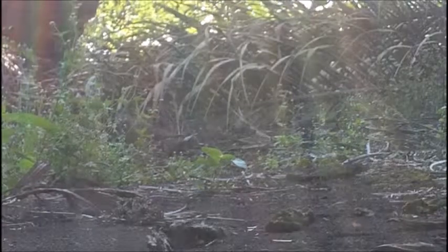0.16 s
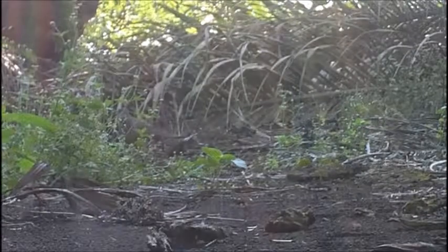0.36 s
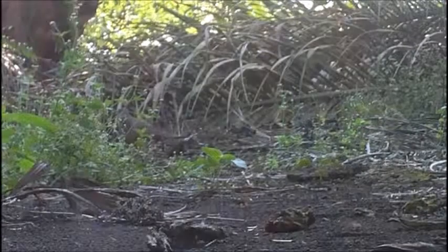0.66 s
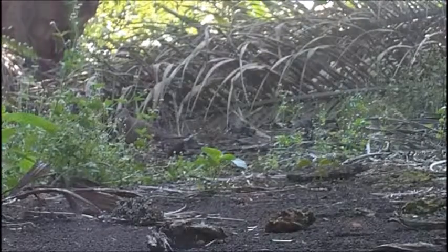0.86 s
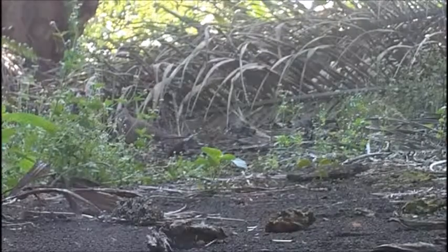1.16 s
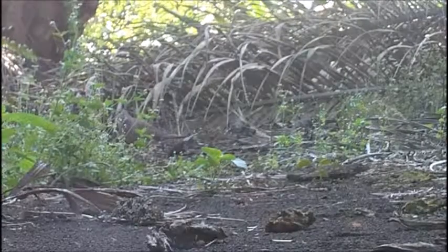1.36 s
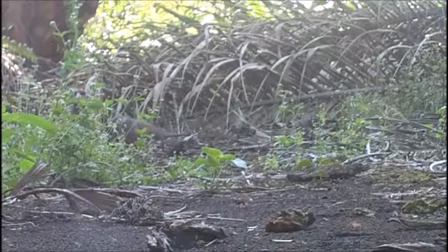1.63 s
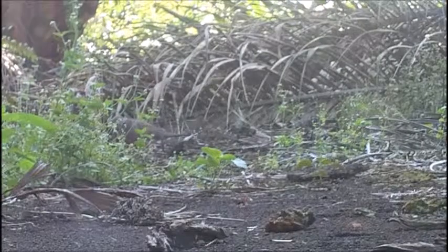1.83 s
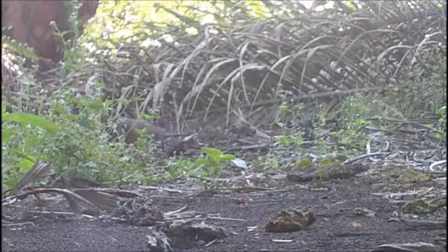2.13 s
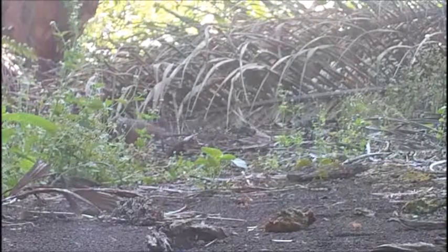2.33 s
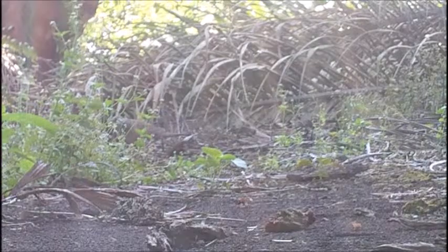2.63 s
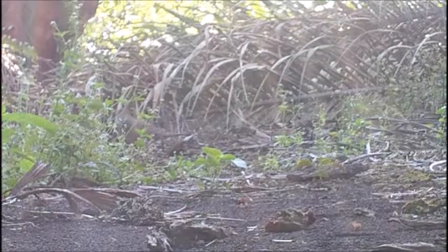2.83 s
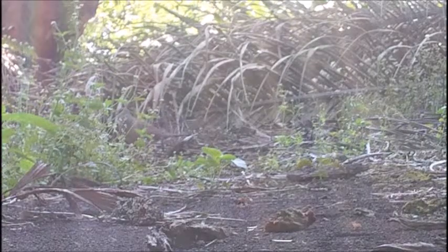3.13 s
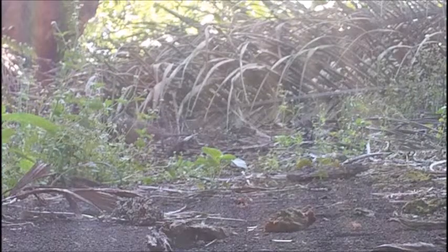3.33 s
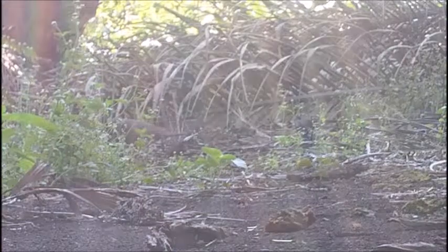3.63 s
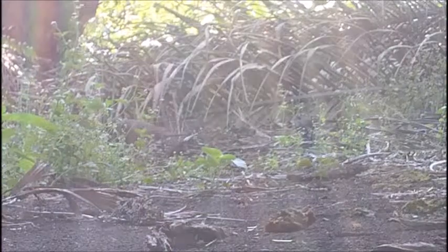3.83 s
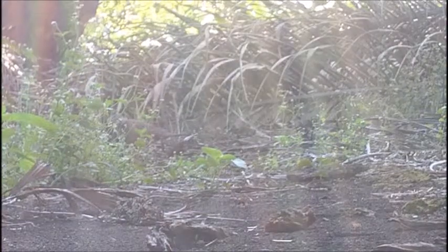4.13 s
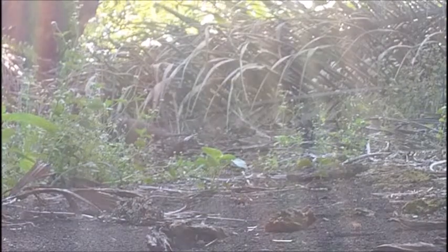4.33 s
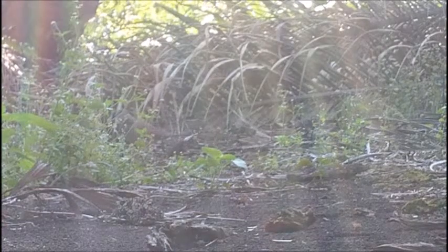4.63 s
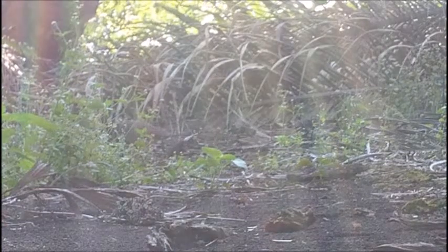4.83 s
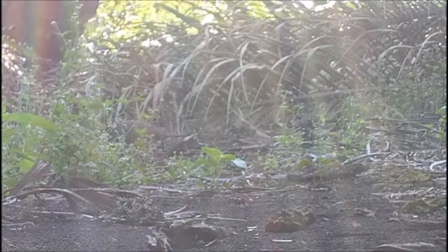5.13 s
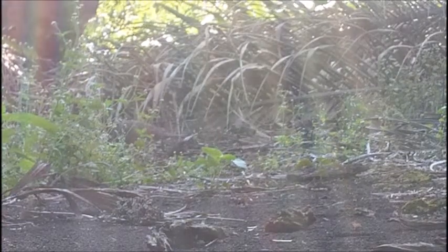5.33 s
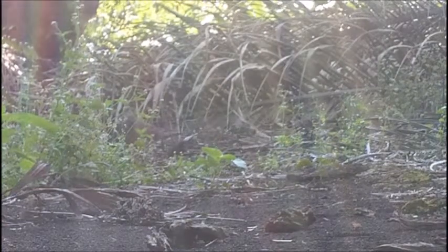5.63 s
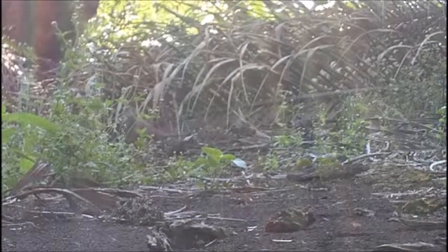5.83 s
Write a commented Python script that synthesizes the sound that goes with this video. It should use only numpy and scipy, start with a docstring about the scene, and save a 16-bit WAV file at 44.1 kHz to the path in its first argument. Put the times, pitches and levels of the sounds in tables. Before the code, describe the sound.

In a leafy thicket, a distant dove hoots and purrs. A small songbird breaks into quick whistled chatter as a nearer dove starts its phrases, each a two-humped coo followed by a rolled, sinking purr. The doves trade calls, and near the end another small bird gives a run of high rising pips. Soft outdoor hiss and a thin insect whine continue underneath, and the calls have short echoes.

```python
"""First come a thin insect whine and soft outdoor hiss. Then two doves, one far and one near, trade coos:
nearly pure tones that a fluttering valve in the throat chops into a purr. Something far away holds one
long call, a songbird chatters in quick gliding whistles, and near the end another bird pips in a rising
series. Faint ticks, a low rumble and stirring leaves lie underneath. The thicket gives every call
short echoes."""
import sys
import numpy as np
from scipy import signal
from scipy.fft import rfft, irfft
from scipy.io import wavfile
from scipy.ndimage import uniform_filter1d

SR = 44100
rng = np.random.default_rng(int(sys.argv[2]) if len(sys.argv) > 2 else 0)


def dump_mix(stems):
    """Bounce the given channels to the path in sys.argv[1] as a 16-bit WAV at rate SR."""
    frames = np.atleast_2d(stems).T  # one column per channel
    limited = np.clip(frames, -1, 1)  # hard clip at full scale
    pcm = np.round(limited * 32767).astype(np.int16)
    wavfile.write(sys.argv[1], SR, pcm)


N = 263718
T = np.arange(N) / SR

# tone colour of the outdoor hiss: (frequency [Hz], relative level [dB])
HISS_SPECTRUM = [(25, -39), (50, -33), (80, -27), (125, -18), (200, -14.5), (280, -10.5), (400, -7),
                 (700, -3.5), (1500, -5.5), (2500, -9), (4500, -13), (9000, -15), (16000, -15)]
# brief dips in the hiss: (middle [s], half length [s], depth [dB])
LEVEL_DIPS = [(.317, .016, 12), (4.546, .016, 12)]
# bands of noise that make up the insect whine: (centre [Hz], width [Hz], level [dB])
INSECT_BANDS = [(7156, 210, -66.5), (7044, 1270, -65), (10260, 1200, -74), (11630, 710, -74.5),
                (14500, 1200, -72.5)]
# soft stirrings in the undergrowth: (middle [s], half length [s], level [dB])
LEAF_STIRS = [(3.7, 0.75, -74.5), (5.854, 0.8, -67)]
# faint treble ticks: (time [s])
TICK_TIMES = [.448, .649, .748, 1.002, 1.7, 1.75, 2.701, 2.801, 3.004, 3.499, 3.75, 4.25, 5.001, 5.799]

# echoes off trunks and a bank: (delay [s], relative level [dB])
TRUNK_ECHOES = [(.026, -10), (.036, -37), (.071, -12)]
# echoes around the pipping bird's perch: (delay [s], relative level [dB])
PIP_ECHOES = [(0.015, -4), (0.034, -12)]
# echoes around the songbird: (delay [s], level [dB])
CHATTER_ECHOES = [(.013, -16), (.026, -9), (.039, -17), (.052, -17), (.071, -11.5)]

# the tune of the long far call: (time [s], base pitch [Hz])
CALL_TUNE = [(.44, 680), (0.554, 701.5), (.63, 685.5), (.78, 684), (0.871, 660), (.98, 632.5), (1.1, 631)]
# its overtones: (multiple of the base pitch, start level [dB], middle level [dB], end level [dB])
CALL_OVERTONES = [(4, -64.5, -71, -82), (5, -73, -71, -80), (6, -78, -71.5, -68.5)]
# the small bird's pips: (time [s], length [s], level [dB], starting pitch [Hz])
PIP_NOTES = [(5.106, .031, -58, 2700), (5.238, 0.023, -55.5, 2830), (5.366, 0.028, -49, 2750),
             (5.487, 0.03, -47.5, 2700), (5.615, 0.063, -50.5, 2630), (5.759, 0.062, -51.5, 2635),
             (5.92, 0.051, -50, 2560)]
# the songbird's pitch glides, by syllable name: (start [Hz], middle [Hz], end [Hz])
SYLLABLE_GLIDES = {"rise": (1154, 1610, 2420), "whistle": (2420, 2250, 2210), "low": (1630, 1490, 1360),
                   "slur": (2160, 1900, 1620), "high": (3000, 2800, 2430), "drop": (3050, 2700, 1980)}
# its chatter and a few stray notes: (time [s], length [s], level [dB], rasp [0-1], syllable name)
CHATTER_NOTES = [(.002, 0.028, -55.5, 0.35, "rise"), (.004, 0.016, -57.5, 0.9, "high"),
                 (0.558, 0.018, -54, 0.3, "high"), (1.203, 0.019, -46, 0, "rise"),
                 (1.222, 0.039, -40, 0.25, "whistle"), (1.278, 0.02, -43, 0.03, "low"),
                 (1.338, 0.038, -38.5, 0.25, "slur"), (1.424, 0.026, -42.5, 0.74, "drop"),
                 (1.44, 0.021, -51, 0, "low"), (1.52, 0.026, -47, 0.6, "rise"),
                 (1.542, .024, -43, 0.5, "whistle"), (1.609, 0.013, -46, 0.1, "low"),
                 (1.665, 0.051, -49, 1, "slur"), (1.758, 0.033, -41, 0.56, "high"),
                 (1.849, 0.043, -51.5, 0.9, "rise"), (1.88, 0.031, -37.5, 0.07, "whistle"),
                 (1.93, 0.044, -52, 0.25, "low"), (2.011, 0.05, -45, 0.43, "slur"),
                 (2.105, 0.022, -46, 0.93, "high"), (2.204, 0.027, -49, 0.54, "rise"),
                 (2.237, 0.018, -36.5, 0, "whistle"), (3.33, 0.024, -59, 0.5, "low"),
                 (3.338, 0.028, -60, .55, "whistle"), (3.472, 0.018, -57.5, 0.4, "rise"),
                 (3.574, 0.019, -57.5, 0.8, "rise"), (3.698, 0.025, -61, 1, "rise"),
                 (3.896, 0.019, -58, 0.7, "high")]

# the far dove's short hoots: (time [s], length [s], relative level [dB], pitch [Hz],
# flutter depth [0 = none, 1 = full])
HOOT_NOTES = [(0.462, 0.13, -43.5, 740, 0.11), (3.603, 0.058, -45.5, 668, 1.06),
              (3.655, 0.061, -44, 703, 0)]
# the two-humped coo that opens each phrase of the near dove: (time [s], length [s], relative level [dB],
# first hump [Hz], dip [Hz], second hump [Hz], dip depth [dB], dip after [s], second hump after [s],
# flutter ends after [s])
OPENING_COOS = [(1.669, 0.38, -38, 709, 501, 719, 23, 0.11, 0.28, 0.26),
                (3.362, 0.23, -38.5, 716, 563, 691, 9.5, 0.11, 0.22, 0.22),
                (4.779, .211, -39, 699, 620, 673, 3, 0.088, 0.178, .22)]
# the long purrs that close a phrase: (time [s], length [s], relative level [dB], pitch [Hz],
# share of pitch lost [0-1], fade [dB], first flutter rate [Hz], full flutter rate [Hz],
# flutter depth [0 = none, 1 = full], which dove)
PURR_NOTES = [(.731, 0.48, -44.5, 767.6, 0.31, 18.5, 41, 56.7, 1.03, "far"),
              (2.212, 0.51, -37, 737, 0.2, 7, 47, 62.4, 1.01, "near"),
              (3.768, .31, -38, 740, 0.07, -0.5, 37.4, 63, 1.04, "near"),
              (3.981, .47, -43.5, 779, 0.18, 10, 48, 56, 0.74, "far"),
              (5.152, .525, -37.5, 727.5, .18, 8, 64, 69, 0.9, "near"),
              (5.515, 0.42, -43.5, 745, 0.29, 26, 52, 56, 0.93, "far")]
EVEN_UNREST = .1  # share of the stumbling that stays even in a steady flutter


def amp(db):
    """Turns decibels into a gain to multiply by."""
    return 10 ** (np.asarray(db) / 20)


def evened(x):
    """Scales a signal to an average strength (rms) of 1."""
    return x / np.sqrt(np.mean(x ** 2) + 1e-20)


def add(mix, s, sound):
    """Mixes a sound in at time s."""
    part = mix[max(round(s * SR), 0):][:len(sound)]
    part += sound[:len(part)]


def span(s, length):
    """The sample positions of an event, and the time since its start."""
    at = np.arange(int(s * SR), min(int((s + length) * SR), N))
    return at, (at - at[0]) / SR


def noise(gain):
    """Noise of strength 1 whose tone colour is set by gain(frequency)."""
    hz = np.fft.rfftfreq(N, 1 / SR)
    return evened(irfft(rfft(rng.standard_normal(N)) * gain(hz), N))


def soft_band(centre_hz, width_hz):
    """Noise in a bell-shaped band of frequencies."""
    return noise(lambda f: np.exp(-((f - centre_hz) / width_hz) ** 2))


def ringing_band(centre_hz, width_hz):
    """Noise with a peak at one frequency and long slopes to either side."""
    return noise(lambda f: 1 / (1 + (2 * (f - centre_hz) / width_hz) ** 2))


def wander(hz):
    """A smooth random wobble that moves up to about hz times a second."""
    return soft_band(0, hz)


def hiss_and_insects(hiss_db=-59.5, flicker_db=.6):
    """Soft wide hiss that flickers a little, and the thin whine of many insects; both dip briefly twice."""
    hz, db = np.transpose(HISS_SPECTRUM)
    hiss = amp(hiss_db) * noise(lambda f: amp(np.interp(np.log(f + 1), np.log(hz), db)))
    whine = sum(amp(level) * ringing_band(centre, width) for centre, width, level in INSECT_BANDS)
    whine /= evened(np.sqrt(uniform_filter1d(whine ** 2, size=1500)))  # the chorus holds its loudness
    dips_db = sum(depth * np.exp(-((T - s) / half) ** 4) for s, half, depth in LEVEL_DIPS)
    return hiss * amp(flicker_db * wander(21) - dips_db) + whine * amp(-dips_db / 2)


def rumble(level_db=-85, swell_db=7, peak_s=2.72, swell_s=1.0, drift_db=1.0):
    """A faint far rumble that swells once and sinks, drifting a little."""
    swell = np.exp(-((T - peak_s) / swell_s) ** 2)
    db = level_db + swell_db * swell + drift_db * wander(11)
    return amp(db) * ringing_band(centre_hz=205, width_hz=60)


def rustle(patchy_db=2.0):
    """Leaves stir in small uneven bursts."""
    stir = sum(amp(db) * np.exp(-((T - s) / half) ** 2) for s, half, db in LEAF_STIRS)
    return stir * soft_band(centre_hz=1950, width_hz=750) * amp(patchy_db * wander(40))


def ticks(length_s=0.028, level_db=-59):
    """Tiny soft puffs of treble."""
    envelope = np.zeros(N)
    for s in TICK_TIMES:
        add(envelope, s - length_s / 4, signal.windows.hann(int(length_s * SR)))
    return amp(level_db) * envelope * soft_band(centre_hz=9000, width_hz=5000)


def thicket(sound, echoes, echo_db, scatter_db, decay_s):
    """Adds a few distinct echoes and a thin tail scattered by leaves and stems."""
    t = np.arange(SR // 2) / SR
    bounces = rng.standard_normal(len(t)) * (rng.random(len(t)) < 2000 / SR)  # about 2000 a second
    tail = bounces * amp(-60 * t / decay_s) * (t > .006)
    response = amp(scatter_db) * tail / np.linalg.norm(tail)
    response[0] = 1  # the sound that arrives directly
    for delay, db in echoes:
        response[int(delay * SR)] += amp(db + echo_db)
    return signal.fftconvolve(sound, response)[:N]


def far_call(unsteady=0.0036, waver_db=2.5):
    """A held cry that peaks early, then sinks; its strength moves from the lowest overtone to the top."""
    out = np.zeros(N)
    times, pitches = np.transpose(CALL_TUNE)
    at, t = span(times[0], times[-1] - times[0])
    hz = np.interp(T[at], times, pitches) * (1 + unsteady * wander(53)[at])
    phase = 2 * np.pi * np.cumsum(hz) / SR
    for multiple, *levels in CALL_OVERTONES:
        db = np.interp(t / t[-1], [0, .5, 1], levels) + waver_db * wander(18)[at]
        out[at] += amp(db) * signal.windows.tukey(len(at), .17) * np.sin(multiple * phase)
    return out


def pipping_bird(climb_hz=750, flick_hz=1900, fade_db=12, husk_db=-18):
    """Each whistled pip climbs slowly, then flicks upward as it fades, over a trace of husky noise."""
    out = np.zeros(N)
    waver, flutter = 1 + .025 * wander(160), amp(2.5 * wander(120))
    husk = amp(husk_db) * soft_band(centre_hz=2100, width_hz=500)
    for s, length, db, low_hz in PIP_NOTES:
        progress = np.linspace(0, 1, int(length * SR))
        at = np.minimum(int(s * SR) + np.arange(len(progress)), N - 1)
        flick = progress ** 5
        hz = (low_hz + climb_hz * progress + flick_hz * flick) * waver[at]
        whistle = np.sin(2 * np.pi * np.cumsum(hz) / SR)
        envelope = np.sqrt(progress) * flutter[at] * signal.windows.tukey(len(at), .15)
        add(out, s, amp(db - fade_db * flick) * envelope * (whistle + husk[at]))
    return out


def songbird(rasp_hz=280, overtone_db=-30, top_hz=3300, rise_share=0.31, fall_share=0.3):
    """Quick whistled glides; a fast uneven warble turns some of them harsh."""
    out, shake = np.zeros(N), soft_band(rasp_hz, rasp_hz)
    for s, length, db, rasp, name in CHATTER_NOTES:
        progress = np.linspace(0, 1, int(length * SR))
        warble = rasp * shake[int(s * SR):][:len(progress)]
        glide_hz = np.polyval(np.polyfit([0, .5, 1], SYLLABLE_GLIDES[name], 2), progress)
        phase = 2 * np.pi * np.cumsum(glide_hz * (1 + .12 * warble)) / SR
        tone = np.sin(phase) + amp(overtone_db) * np.sin(2 * phase)
        ramp = np.clip(np.minimum(progress / rise_share, (1 - progress) / fall_share), 0, 1)
        envelope = np.sin(np.pi / 2 * ramp) ** 2
        add(out, s, amp(db) * envelope * (1 + .5 * warble[::-1]) * tone)
    return signal.sosfiltfilt(signal.butter(6, top_hz, fs=SR, output="sos"), out)


def breath(t, db, hz, rise_s, fall_s):
    """A coo's level and pitch rise together as pressure builds, and drop together as it is let go."""
    start = np.maximum(1 - t / rise_s, 0) ** 1.425
    stop = np.maximum(1 - (t[-1] - t) / fall_s, 0) ** 1.23
    return db - 10 * start - 5.5 * stop, hz * (1 - .2705 * start - .21 * stop)


def hoot(s, length, db, hz, depth, edge_db=14.5, bend=0.259, flutter_hz=73.5):
    """Shapes a short coo: one arch of pitch and loudness."""
    at, t = span(s, length)
    edge = (2 * t / length - 1) ** 2
    return at, db - edge_db * edge, hz * (1 - bend * edge), flutter_hz, depth, EVEN_UNREST


def opening_coo(s, length, db, first_hz, dip_hz, second_hz, dip_db, dip_s, second_s, flutter_end_s,
                first_s=0.0431, clean_s=0.0352, switch_s=0.023, sink=0.068, flutter_hz=75):
    """Shapes a two-humped coo: it starts clean, dips as the valve begins to flutter, and rises again."""
    at, t = span(s, length)
    stage = np.interp(t, [first_s, dip_s, second_s, length], np.arange(4))
    eased = stage - np.sin(2 * np.pi * stage) / (2 * np.pi)  # lingers at each turn
    hz = np.interp(eased, np.arange(4), [first_hz, dip_hz, second_hz, second_hz * (1 - sink)])
    db = db - dip_db * np.maximum(1 - abs(stage - 1), 0) ** 2.5
    db, hz = breath(t, db, hz, rise_s=0.0242, fall_s=0.021)
    depth = np.clip(np.minimum(t - clean_s, flutter_end_s - t) / switch_s, 0, 1)
    return at, db, hz, flutter_hz, depth, EVEN_UNREST


def purr(s, length, db, hz, sink, fade_db, first_rate, full_rate, depth,
         quicken_s=.19, steady_s=0.1426, unsettle_s=0.097):
    """Shapes a rolled coo: it sinks and fades as the air runs out; the flutter quickens, then stumbles."""
    at, t = span(s, length)
    progress = t / length
    hz = hz * (1 - sink * progress ** 1.7)
    db = db - fade_db * progress ** 4.2  # loudness holds longer than pitch
    db, hz = breath(t, db, hz, rise_s=0.0268, fall_s=0.0337)
    flutter_hz = np.interp(t, [0, quicken_s], [first_rate, full_rate])
    unrest = np.clip((t - steady_s) / unsettle_s, EVEN_UNREST, 1)
    return at, db, hz, flutter_hz, depth * (1 - .18 * progress ** 2), unrest


def purrs(which):
    """The shapes of all the purrs of one dove."""
    return [purr(*row) for *row, who in PURR_NOTES if who == which]


def dove(coos, sag, lag, stumble, openness, snap, skip, ring, gain_db, crop_hz=590):
    """Sings the coo shapes: a fluttering valve chops a nearly pure tone into pulses that scoop upward."""
    out = np.zeros(N)
    pace, leak = stumble * wander(43), skip * abs(wander(48))
    swell, tremor = amp(wander(50)), wander(70)
    for at, db, hz, flutter_hz, depth, unrest in coos:
        beat = 2 * np.pi * np.cumsum(flutter_hz * np.exp(unrest * pace[at])) / SR
        depth = np.clip(depth * (1 - unrest * leak[at]), 0, 1)  # the valve does not always close fully
        skewed = beat + snap * (1 - np.cos(beat))  # it opens faster than it shuts
        shut = depth * ((1 + np.cos(skewed)) / 2) ** openness
        slack = depth * ((1 + np.cos(skewed - lag)) / 2) ** 2  # tension lags the opening
        waver = 1 + (.007 + (.018 + .016 * unrest) * depth) * tremor[at]  # flutter unsettles the pitch
        phase = 2 * np.pi * np.cumsum(hz * waver * (1 - sag * slack)) / SR
        tone = np.sin(phase) + amp(-38) * np.sin(2 * phase)
        out[at] += amp(db + gain_db) * swell[at] * (1 - shut) * tone * signal.windows.tukey(len(at), .03)
    # the crop, a puffed-up throat pouch, rings on between pulses and cannot send out the lowest tones
    out += ring * signal.lfilter(*signal.iirpeak(crop_hz, 6, SR), out)
    return signal.sosfiltfilt(signal.butter(6, 450, "high", fs=SR, output="sos"), out)


def scene():
    """Gives each caller its echoes and adds the background, the same in both ears."""
    near = dove([opening_coo(*row) for row in OPENING_COOS] + purrs("near"),
                sag=.19, lag=1.0, stumble=0.4, openness=1.5, snap=0.42, skip=0.22, ring=0.35, gain_db=0.5)
    far = dove([hoot(*row) for row in HOOT_NOTES] + purrs("far"),
               sag=.19, lag=.96, stumble=.19, openness=.9, snap=.13, skip=.14, ring=.088, gain_db=-0.6)
    calls = thicket(near, TRUNK_ECHOES, echo_db=-13, scatter_db=-20, decay_s=0.27)
    calls += thicket(far, TRUNK_ECHOES, echo_db=-4.5, scatter_db=-31, decay_s=0.15)
    calls += thicket(songbird(), CHATTER_ECHOES, echo_db=0, scatter_db=-3.5, decay_s=0.55)
    calls += thicket(pipping_bird(), PIP_ECHOES, echo_db=-0.5, scatter_db=0.5, decay_s=0.42)
    calls += thicket(far_call(), TRUNK_ECHOES, echo_db=-8, scatter_db=2.5, decay_s=0.32)
    mono = calls + ticks() + rustle() + rumble() + hiss_and_insects()
    return np.array([mono, mono])


def record(dry, top_hz=15330):
    """Steeply cuts off the very highest treble."""
    lowpass = signal.firwin(1023, top_hz, window=("kaiser", 8), fs=SR)
    return signal.oaconvolve(dry, lowpass[None], "same")


dry = scene()
out = record(dry)
dump_mix(out)
```